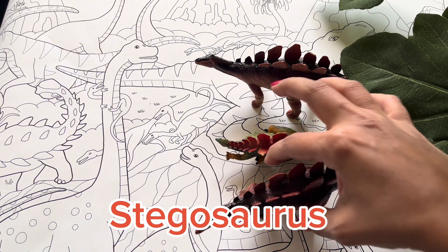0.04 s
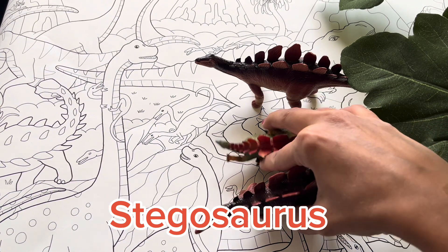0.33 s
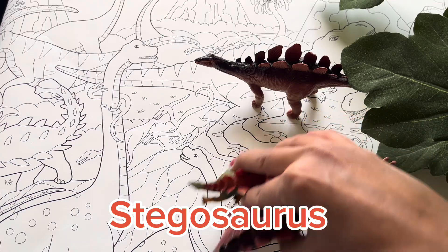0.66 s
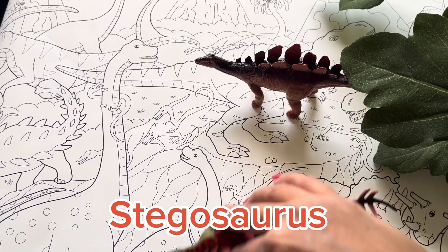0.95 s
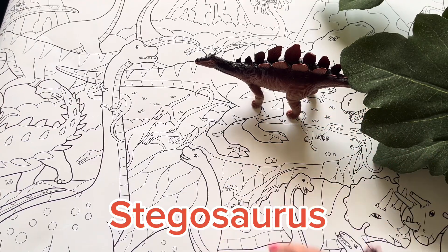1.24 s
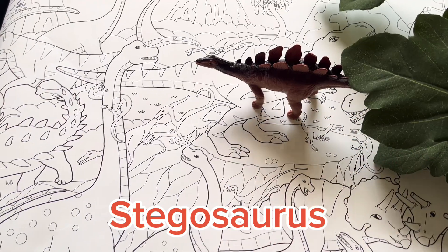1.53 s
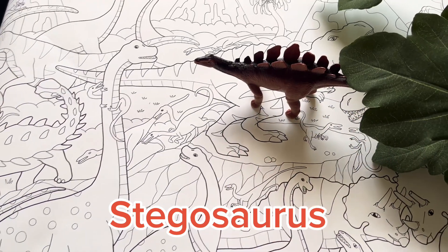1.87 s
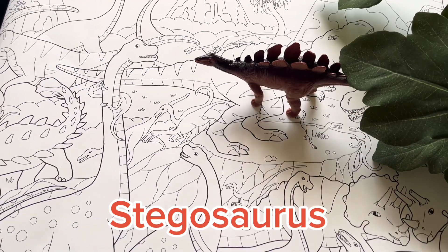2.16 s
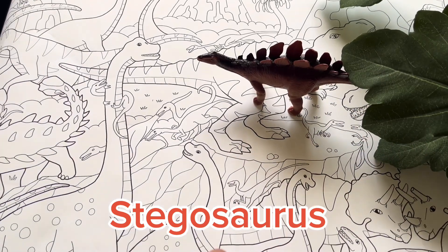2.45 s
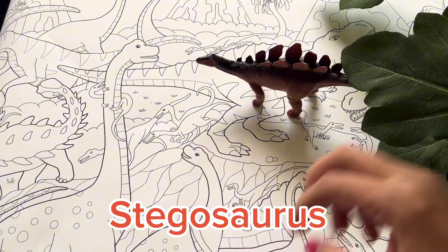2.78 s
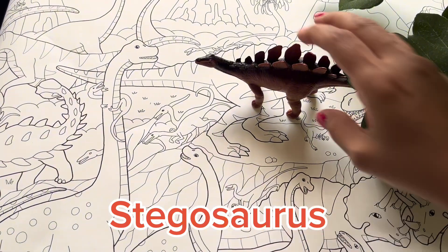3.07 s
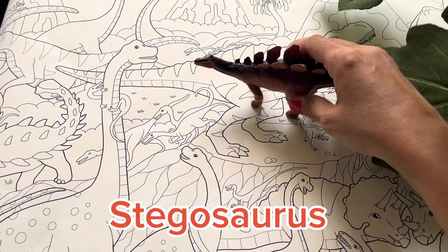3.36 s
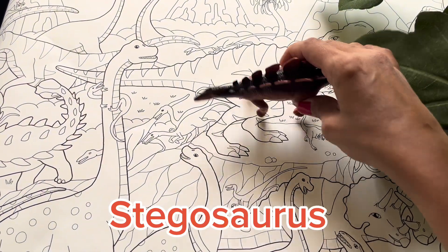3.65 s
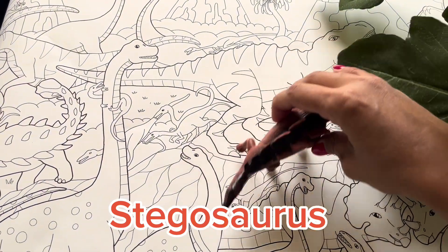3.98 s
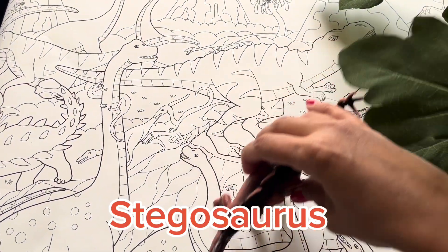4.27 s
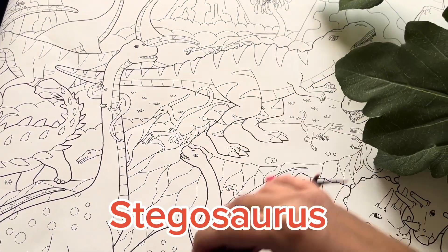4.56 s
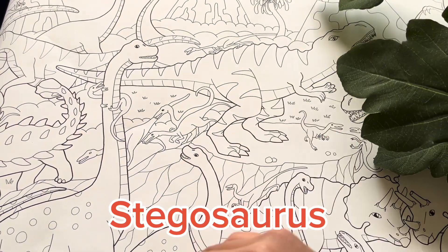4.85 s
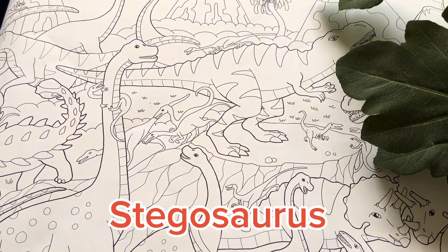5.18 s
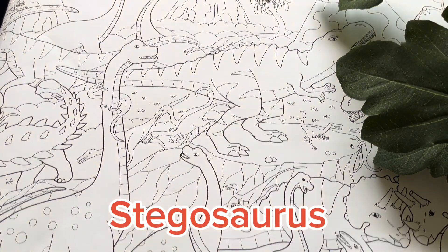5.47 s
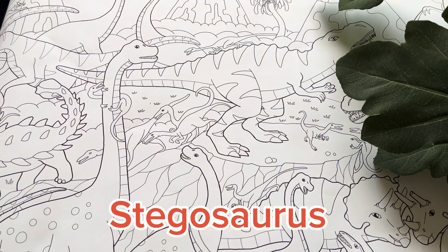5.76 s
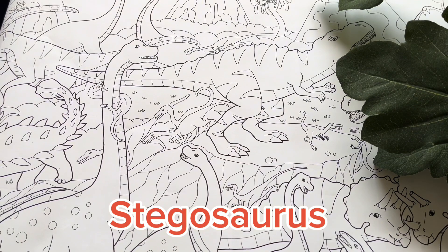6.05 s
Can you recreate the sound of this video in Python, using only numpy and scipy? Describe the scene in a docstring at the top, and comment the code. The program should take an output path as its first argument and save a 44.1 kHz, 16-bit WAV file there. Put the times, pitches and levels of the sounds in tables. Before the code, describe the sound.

Close to the microphone in a small room, a hand picks plastic toy figures off a paper poster with a cluster of soft thuds and snaps. They are put down on the tabletop with knocks, a short scrape and faint squeaks. Another figure is lifted with a sharp snap and a few clicks, and one loud knock comes last. Fingers rub and tick lightly over a faint appliance hum.

```python
"""Over the faint hum of an appliance, plastic toy figures thud and snap on a paper poster in a small room.
Lifted off and put down close to the microphone, they knock, scrape and squeak on the tabletop.
Each impact excites the damped modes of paper, plastic or wood; the table's ring reaches the microphone
through its stand. Fingers rub and tick on the plastic by stick-slip friction. One loud knock comes last."""
import sys
import numpy as np
from scipy import signal
from scipy.fft import rfft, irfft, next_fast_len
from scipy.io import wavfile

SR = 44100
rng = np.random.default_rng(int(sys.argv[2]) if len(sys.argv) > 2 else 0)


def bounce(signal):
    """Save signal as a 16-bit WAV file at the path given by the first command-line argument."""
    frames = np.transpose(np.atleast_2d(signal))
    limited = np.clip(frames, -1, 1)
    pcm = np.round(limited * 32767).astype(np.int16)
    wavfile.write(sys.argv[1], SR, pcm)


N = 274169
TIME = np.arange(N) / SR
SCUFF_HZ, RASP_HZ, AIR_HZ = (673, 2030), (2510, 5960), (8270, 14000)
# modes of the tabletop: (frequency [Hz], level [dB], t60 before the hand alters it [s])
TABLE_MODES = [(74.4, -24, 0.3), (112.3, -29.5, 0.56), (206.5, -13, 0.26), (278, -21, 0.096),
               (381, -2, 0.03), (437.2, -9.5, 0.069), (474.7, -5.5, 0.044), (588, -28, 0.21),
               (670, -16, 0.073), (893.4, -21.5, 0.078), (932, -16.5, 0.024), (1135, -15.5, 0.022),
               (1239, -18, 0.031), (1747, -27, 0.043), (1846, -56, 0.1), (2038, -30.5, 0.018),
               (2246, -34.5, 0.029), (3054, -31.5, 0.021)]
# points at which a blow's drive is given: (frequency [Hz])
BLOW_HZ = [200, 420, 700, 1400]


def from_db(db):
    """Decibels to amplitude ratio."""
    return 10 ** (np.asarray(db) / 20)


def rms_one(x):
    """Normalisation to unit power."""
    return x / np.sqrt(np.mean(x ** 2) + 1e-20)


def at_hz(points, hz):
    """Interpolation on a log-frequency axis."""
    f, value = np.transpose(points)
    return np.interp(np.log(hz), np.log(f), value)


def band(x, edges_hz, kind="band", order=2):
    """Causal Butterworth filter."""
    sections = signal.butter(order, np.clip(edges_hz, 10, SR * 9 / 20), kind, fs=SR, output="sos")
    return signal.sosfilt(sections, x + 1e-18)


def shaped(x, gain_at):
    """Linear filtering: the spectrum times a frequency response."""
    size = next_fast_len(N + 4096, True)
    hz = np.maximum(np.arange(size // 2 + 1) * SR / size, 1)
    return irfft(rfft(x, size) * gain_at(hz), size)[..., :N]


def drift(per_s):
    """Random modulation of unit power."""
    knots = rng.standard_normal(4096)
    return rms_one(np.interp(TIME * per_s, np.arange(len(knots)), knots))


def held(start, end, rise_s, fall_s):
    """Envelope of a movement: linear rise, plateau, exponential decay."""
    return np.clip((TIME - start) / rise_s, 0, 1) * np.exp(-np.clip((TIME - end) / fall_s, 0, 20))


def ring(drive, hz, t60):
    """Damped resonator: a unit impulse starts a decaying unit sine."""
    r, w = from_db(-60 / (t60 * SR)), 2 * np.pi * hz / SR
    return signal.lfilter([0, np.sin(w)], [1, -2 * r * np.cos(w), r * r], drive + 1e-18)


def grains(per_s, spread_db):
    """Stick-slip friction as a Poisson train of uneven impulses."""
    sizes = from_db(spread_db * np.minimum(rng.exponential(1, N), 4)) * rng.choice([-1, 1], N)
    return sizes * (rng.random(N) < per_s / SR)


def diffuse(pair, direct=0):
    """Spatial coherence: the two microphone ports agree in the bass, and more so for direct sound."""
    # diffuse field: (frequency [Hz], left-right correlation [-1..1])
    coherence = [(60, 0.93), (290, 0.61), (640, 0.28), (1400, -0.42), (3100, 0.63), (6800, -0.64),
                 (13000, 0.72)]

    def weights(hz):
        alike = np.clip(direct + (1 - direct) * at_hz(coherence, hz), -.99, .99)
        return np.sqrt(1 + np.array([[1], [-1]]) * alike)
    mid, side = shaped(pair, weights)
    return np.array([mid + side, mid - side])


def panned(x, balance):
    """Frequency-dependent level difference between the ports."""
    return shaped(x, lambda hz: from_db(np.array([[.5], [-.5]]) * at_hz(balance, hz)))


def room(x, t60, wet_db):
    """Reverberation: dense reflections decay exponentially, differently at each port."""
    age = TIME[:SR // 2]
    tail = rng.standard_normal((2, len(age))) * from_db(-60 * age / t60) * (age > .004)
    tail = band(tail, 8400, "low", order=1)   # walls absorb the treble
    tail /= np.sqrt(np.sum(tail ** 2, axis=1, keepdims=True))
    return x + from_db(wet_db) * signal.fftconvolve(x, tail, axes=1)[:, :N]


def appliance(beat_hz=3.668, swell_s=4.43, waver_db=1.34):
    """Beating: a motor turns a little slower than the mains, so its hum throbs."""
    # hum: (frequency [Hz], rms level [dB], relative level of a partner beat_hz higher [dB])
    partials = [(58.3, -53.5, -19.5), (116.2, -52.5, -3), (175.6, -65, -7), (235.5, -61.5, -8),
                (292, -73.5, -7.5), (352, -74.5, -2.5)]
    beat, hum = 2 * np.pi * beat_hz * (TIME - swell_s), 0
    for hz, db, partner_db in partials:
        phase = 2 * np.pi * (hz * TIME + rng.random())
        amplitude = np.sqrt(2) * from_db(db + waver_db * drift(8.4))
        hum = hum + amplitude * (np.sin(phase) + from_db(partner_db) * np.sin(phase + beat))
    return hum


def still_air(db=-50.5):
    """The room's ambient noise is a diffuse field, strongest in the bass."""
    # noise spectrum: (frequency [Hz], relative density [dB])
    spectrum = [(30, -26), (55, 6.5), (90, 0.5), (160, -7), (300, -14.5), (500, -23.5), (900, -34),
                (1500, -25), (2000, -33.5), (2550, -54), (4000, -66.5), (6500, -46), (12500, -53.5),
                (16000, -77)]
    air = shaped(diffuse(rng.standard_normal((2, N))), lambda hz: from_db(at_hz(spectrum, hz)))
    return from_db(db) * rms_one(air)


def brushing():
    """Gains of scuff, rasp and air: the hand's sweeps add in power to a faint hiss."""
    # sweeps of the hand: (start [s], end [s], rasp level [dB], air above rasp [dB])
    sweeps = [(0.502, 0.704, -86, 18.5), (1.088, 1.383, -73, 1), (1.63, 1.798, -69, 0.5),
              (1.894, 2.144, -80, 2), (2.307, 2.69, -69, -0.5), (2.85, 3.003, -75, 2),
              (3.256, 3.385, -69, -4.5), (3.543, 3.853, -70.5, -1.5), (3.89, 4.298, -65, -6),
              (4.56, 4.85, -86, 8), (4.802, 5.493, -71.5, 0), (6.036, 6.22, -68.5, -7)]
    rasp, air = from_db(-80.5), from_db(-92.5)
    for start, end, db, air_db in sweeps:
        sweep = from_db(db) * held(start, end, rise_s=0.086, fall_s=0.026)
        rasp, air = np.hypot(rasp, sweep), np.hypot(air, from_db(air_db) * sweep)
    return np.array([np.zeros(N), rasp, air])


def contact_gains(db, brightness, fall_db_per_octave):
    """Spectral envelope of a contact: scuff, rasp and air weaken with distance from its brightness."""
    octaves = np.log2([SCUFF_HZ, RASP_HZ, AIR_HZ]).mean(axis=1)
    away = np.abs(octaves - octaves[1] - brightness)
    return from_db(db - fall_db_per_octave * (away - away.min()))[:, None]


def ticks(tick_s=0.0011, crack_db=22.5, grit_db=-1, right_lag_s=.00003):
    """Sudden release: a nail or an edge lets go with an impulsive crack and a puff of grit."""
    # ticks: (time [s], level [dB], brightness [octaves above the rasp])
    releases = [(0.3186, -45, -0.91), (0.3662, -50, -1.6), (0.716, -57.5, 1.8), (0.8805, -53, 0.26),
                (0.8947, -55, 0), (0.944, -58, 0.1), (0.949, -50, 0.12), (1.0697, -48.5, -0.07),
                (1.074, -64, 0.1), (1.1137, -47, -0.87), (1.138, -49, 1.9), (1.143, -62, 1.7),
                (1.3845, -48.5, 0.72), (1.689, -43.5, 0.46), (1.7563, -55, 1.7), (1.788, -37.5, 1.42),
                (1.7912, -47, 1.2), (1.7938, -49, 1.6), (1.8163, -55, 1.7), (1.8452, -52.5, 1.7),
                (1.917, -48.5, -1.11), (1.994, -61, -1), (2.0032, -64, 0.51), (2.032, -61.5, 1),
                (2.113, -60, 0.5), (2.1446, -42.5, 0.88), (2.3126, -41, 0.39), (2.339, -52.5, 1.1),
                (2.363, -55, 0.78), (2.403, -57.5, 1), (2.433, -58, 0.63), (2.548, -45, -1.32),
                (2.686, -52.5, 1.1), (3.761, -67, 1.7), (3.781, -51, 1.1), (3.8929, -33.5, -0.77),
                (4.1685, -43.5, -1.02), (5.494, -33, 0.51)]
    # placing of scuff, rasp and air: (left minus right [dB])
    pans = [-0.5, 1.5, -1]
    noise, age, out = diffuse(rng.standard_normal((2, N)), direct=0.27), TIME[:SR // 20], 0
    cracks, puffs = np.zeros((2, 3, N))
    for s, db, brightness in releases:
        gains, start = contact_gains(db, brightness, fall_db_per_octave=14), int(s * SR)
        puffs[:, start:start + len(age)] += gains * age / tick_s * np.exp(1 - age / tick_s)
        cracks[:, int((s + tick_s / 2) * SR)] += gains[:, 0]
    for crack, puff, edges_hz, pan_db in zip(cracks, puffs, [SCUFF_HZ, RASP_HZ, AIR_HZ], pans):
        crack = from_db(crack_db) * band(crack, edges_hz, order=3)
        grit = from_db(grit_db) * puff * rms_one(band(noise, edges_hz, order=3))
        tick = np.array([crack, np.interp(TIME - right_lag_s, TIME, crack)]) + grit
        out = out + tick * from_db(pan_db * np.array([[.5], [-.5]]))
    return out


def fingers(release_s=0.0091, brush_db=-3, ring_db=-2, ring_t60=0.0018):
    """Friction noise: tiny slips and ticks, filtered by the resonances of plastic and paper."""
    # slides: (start [s], end [s], rise [s], level [dB], brightness [octaves above the rasp], ring [Hz])
    strokes = [(0.032, 0.033, .004, -63, -0.6, 4430), (0.339, 0.489, 0.054, -58, -1.23, 4500),
               (0.402, 0.56, 0.013, -66.5, 0.9, 4670), (0.88, 0.944, 0.0035, -63.5, -0.06, 5340),
               (1.067, 1.134, 0.0028, -62, 0.1, 4520), (1.381, 1.466, 0.0079, -56.5, 0.46, 3940),
               (1.587, 1.666, 0.082, -66.5, 0.6, 4900), (2.103, 2.147, 0.039, -61, 5, 5600),
               (3.151, 3.284, 0.061, -64, -0.54, 3180), (3.504, 3.577, 0.033, -66, 0.25, 5150),
               (3.58, 3.654, .012, -62.5, -1, 3680), (3.776, 3.824, 0.0042, -66.5, 1, 4420),
               (3.882, 3.929, 0.0023, -48.5, -2, 3680), (3.951, 4.119, 0.023, -63.5, -14.5, 1420),
               (4.125, 4.217, 0.029, -58, -1.06, 3500), (4.168, 4.214, .02, -61, 1.8, 3600),
               (4.335, 4.394, 0.048, -65.5, 2, 3830), (5.043, 5.087, 0.021, -76.5, -1.5, 4650)]
    # resonances of the handled things: (frequency [Hz], gain [dB])
    colour = [(620, 10), (950, -2), (1250, 3.5), (1700, -3), (2250, -0.5), (2650, -4.5), (3400, -7),
              (4400, -4.5), (5000, -3), (5700, -6.5), (6600, 0), (9500, -3), (13000, -4)]
    slips = np.array([grains(per_s=2600, spread_db=-0.5) for port in range(2)])
    slips = diffuse(slips, direct=0.24) * from_db(1.36 * drift(90))
    sliding, out = 0, ticks()
    rasp = band(slips, RASP_HZ)
    for start, end, rise, db, brightness, hz in strokes:
        stroke = contact_gains(db, brightness, fall_db_per_octave=6.5) * held(start, end, rise, release_s)
        sliding = sliding + stroke
        out = out + from_db(ring_db) * stroke[1] * rms_one(ring(rasp, hz, ring_t60))
    sliding = np.hypot(sliding, from_db(brush_db) * brushing())
    for slide, edges_hz in zip(sliding, [SCUFF_HZ, RASP_HZ, AIR_HZ]):
        out = out + slide * rms_one(band(slips, edges_hz, order=3))
    return room(shaped(out, lambda hz: from_db(at_hz(colour, hz))), t60=0.25, wet_db=-13.0)


def blow_drive(strength_db, hardness, spot_db, hollow_db=0):
    """Modal excitation in dB at BLOW_HZ: hardness favours high modes, the spot trades body for knock."""
    # effect of the struck spot at each of BLOW_HZ: (share of spot_db [ratio])
    spot_share = [-0.36, 0.81, -0.76, 0.64]
    octaves = np.log2(BLOW_HZ)
    tilt_db = hardness * (octaves - octaves.mean())
    return strength_db + tilt_db + spot_db * np.array(spot_share) + hollow_db * np.array([0, 0, 1, 0])


def strike(modes, s, drive_db, spread_s, rise_cycles, pitch=1, sustain=1):
    """Dispersion in a struck plate: low bending waves are slower, so the boom follows the clack."""
    hz, level_db, t60 = np.array(modes).T[:, :, None]
    start, out = int(s * SR), np.zeros(N)
    delay = spread_s * (np.sqrt(hz.max() / hz) - 1)
    age = np.maximum(TIME[start:start + SR // 2] - s - delay, 0)
    mode_db = level_db + np.interp(np.log(hz), np.log(BLOW_HZ), drive_db)
    decay = from_db(mode_db - 60 * age / (t60 * sustain))
    swell = 1 - np.exp(-(age * hz / rise_cycles) ** 2)
    out[start:start + SR // 2] = np.sum(decay * swell * np.sin(2 * np.pi * hz * pitch * age), axis=0)
    return out


def poster(bottom_hz=60, hollow_db=-7):
    """Air cushioning: struck paper flaps on the air under it with a soft, hollow thud."""
    # modes of the loose sheet: (frequency [Hz], level [dB], t60 [s])
    modes = [(77, -34, 0.42), (116, -28, 0.15), (184.6, -18.5, 0.2), (203.4, -9.5, 0.12),
             (235, -22.5, 0.24), (272.5, -23, 0.13), (330, -14.5, 0.029), (458, -28, 0.081),
             (721, -34, 0.16), (851, -25.5, 0.036), (917, -27, 0.047), (1204, -42, 0.067),
             (1960, -52, 0.091)]
    # feet and fingers landing: (time [s], level [dB], hardness [dB/octave], spot [dB], pitch [ratio])
    blows = [(0.318, -13.5, -3.5, 14, 1.24), (0.327, -18.5, 2.5, -19.5, 0.9), (0.349, -23.5, -2, 5, 1.33),
             (0.367, -25, 7, -17, 1.32), (0.388, -20.5, -2, 4, 1.54), (0.4167, -13, -4, 20.5, 1.28),
             (0.432, -25, -0.5, 20, 1.76), (0.52, -23, -1, 5, 1.32), (0.54, -34, 6, 8, 1.5),
             (1.114, -15, -4, 28.5, 0.61), (1.118, -18.5, -2.5, 18, 1.23), (3.516, -24.5, 3, -4, 1.19),
             (3.8915, 4, -1.5, 5.5, 1.037)]
    hollow = hollow_db * np.array([0, 1, 1, 0])
    thuds = sum(strike(modes, s, blow_drive(*blow) + hollow, spread_s=0.00077, rise_cycles=0.54,
                       pitch=pitch) for s, *blow, pitch in blows)
    thuds = band(thuds, bottom_hz, "high")
    return room(np.array([thuds, thuds]), t60=0.67, wet_db=-16.0)


def figure(grit_db=5.5):
    """Shell resonance: feet catch on the paper in snaps and gritty bursts that ring the hollow figure."""
    # modes of the shell: (frequency [Hz], level [dB], t60 [s])
    modes = [(934, 0, 0.019), (1273, 2.5, 0.012), (2050, -2, 0.0032), (3150, -6, 0.012),
             (3570, -2.5, 0.0043), (4560, -10, 0.008), (11200, -19.5, 0.0022)]
    # feet rasping: (start [s], end [s], level [dB], tilt [dB/octave])
    scrapes = [(0.391, 0.396, -57, -14), (0.419, 0.436, -49, -20), (0.473, 0.484, -56.5, 1),
               (0.502, 0.511, -48, -5), (1.105, 1.13, -64, 0.5), (2.528, 2.558, -67, 0),
               (3.507, 3.561, -56, -13), (3.889, 3.892, -30, -3.5), (4.157, 4.166, -56, 1),
               (4.172, 4.19, -53, -7), (4.201, 4.21, -48.5, -0.5), (4.213, 4.231, -57, -1.5),
               (4.265, 4.27, -52, -8), (4.372, 4.393, -64, -5)]
    # a foot striking or snapping free: (time [s], level [dB], tilt [dB/octave])
    snaps = [(0.327, -47, 4), (0.367, -34, -2.5), (0.386, -42, -3.1), (0.417, -32, -5), (0.471, -40, -2),
             (0.505, -35, -4), (3.8905, -20, 0.5), (4.1555, -53, 7), (4.161, -45, -4), (4.179, -42, 0),
             (4.187, -45.5, -2), (4.204, -42, 4.5), (4.2095, -45, 5), (4.268, -38, -6)]
    slips, out = grains(per_s=1500, spread_db=grit_db), 0
    bursts = [(from_db(db) * held(start, end, rise_s=0.0018, fall_s=0.0019), tilt)
              for start, end, db, tilt in scrapes]
    for k, (hz, db, t60) in enumerate(modes):
        octaves = np.log2(hz / modes[0][0])
        drive = slips * sum(burst * from_db(tilt * octaves) for burst, tilt in bursts)
        for s, snap_db, tilt in snaps:
            drive[int(s * SR)] += from_db(snap_db + tilt * octaves)
        out = out + (-1) ** k * from_db(db) * ring(drive, hz, t60) / np.std(ring(slips, hz, t60))
    return room(from_db(-3.5) * np.array([out, out]), t60=0.49, wet_db=-14.5)


def squeak(level_db=-68.5, width_hz=220, stutter_db=2.5):
    """Narrow-band stick-slip: a dragged plastic foot squeaks in rough spurts."""
    # spurts: (time [s], half length [s], relative level [dB], pitch [Hz])
    spurts = [(0.032, 0.0076, -5, 4300), (2.457, 0.027, -4, 5100), (2.513, 0.014, -4.5, 5030),
              (2.554, 0.01, 2, 5070), (2.6, 0.0094, -3, 5080), (2.634, 0.012, 3, 5090),
              (2.695, 0.0087, -4, 4920)]
    slips, out = grains(per_s=2700, spread_db=3.0), 0
    for s, half, db, hz in spurts:
        tone = rms_one(band(slips, (hz - width_hz / 2, hz + width_hz / 2)))
        out = out + from_db(level_db + db) * np.exp(-((TIME - s) / half) ** 2) * tone
    return out * from_db(stutter_db * drift(190))


def drag(judder_db=1.5, t60_ratio=0.74):
    """Forced vibration: a figure pushed in fits sticks and slips, driving the hand-damped table."""
    # pushes: (start [s], end [s], level [dB], growth [dB/s], middle, high modes above the low [dB])
    pushes = [(1.352, 1.424, -58.5, -5, -6, -7), (1.969, 2.143, -54.5, 1, -15, -8.5),
              (2.346, 2.435, -44, -21, -17, -14), (2.434, 2.504, -40.5, 68, -10, -4),
              (2.497, 2.539, -39.5, 22, 1, 2.5), (2.54, 2.551, -46.5, 0, 16, -6),
              (2.587, 2.604, -49, -60, 8.5, 7.5), (2.61, 2.651, -44, -70, -8, -18.5),
              (2.682, 2.698, -46.5, 0, -6, -14)]
    slips = grains(per_s=900, spread_db=2.0)
    low, middle, high = [sum(from_db(db) * ring(slips, hz, t60 * t60_ratio) for hz, db, t60 in modes)
                         for modes in (TABLE_MODES[2:9], TABLE_MODES[9:11], TABLE_MODES[11:])]
    low = rms_one(band(low, (330, 620)))
    middle = rms_one(band(middle, (800, 1050)))
    high = rms_one(band(high, (950, 1850), order=5))
    out, judder = 0, from_db(judder_db * drift(170))
    for start, end, db, growth, middle_db, high_db in pushes:
        age = np.clip(TIME, start, end) - start
        force = from_db(db + growth * age) * held(start, end, rise_s=0.013, fall_s=0.0073)
        out = out + force * judder * (low + from_db(middle_db) * middle + from_db(high_db) * high)
    return out


def tabletop(top_hz=2100, bottom_hz=55):
    """Structure-borne sound: knocks and scraping lose their treble in the wood and climb the stand."""
    # figures knocking: (time [s], level [dB], hardness [dB/octave], spot [dB], pitch [ratio],
    # ring length under the hand [ratio], gain near 700 Hz [dB])
    blows = [(1.391, -32, -4, 9.5, 1.1, 0.82, 7), (1.4561, -19.5, 3.5, 4.5, 0.98, 0.79, 6.5),
             (1.7158, -15.5, -2.7, -1, 0.995, 0.53, 13.5), (1.727, -26.5, 4, 3, 1.01, 1.03, 12.5),
             (1.776, -31.5, 5, -4.5, 1.01, 0.98, -2), (1.9163, -20.5, 13.5, -3.5, 0.98, 0.78, -2.5),
             (1.965, -32, 3, -12, 1.06, 1.2, -8.5), (1.994, -25.5, 5, -4.5, 0.97, 1.2, -2),
             (2.009, -29.5, 3, -14, 0.94, 0.87, -1), (2.044, -31.5, 0, -2, 1.07, 0.91, 3.5),
             (2.068, -32.5, -0.5, -13, 0.92, 0.74, 1.5), (2.123, -35, 6, -4.5, 0.94, 1.46, 0),
             (2.1398, -26.5, -2.5, -9, 1.03, 0.71, -7), (2.3115, -3, 4, 5, 0.95, 0.72, -3.5),
             (2.5075, -13, 3, -4, 1.02, 0.54, -10), (2.532, -21.5, 8, 5, 0.84, 0.62, 3),
             (2.586, -25.5, 11.5, -10.5, 0.93, 1.15, -7), (2.686, -31.5, 0, -4, 0.984, 0.54, -1.5),
             (5.495, 1.5, 0.7, 0.5, 0.99, 0.84, -5)]
    # pitches the table hardly carries to the stand: (frequency [Hz], width [Hz])
    nodes = [(570, 75), (815, 71), (1520, 33)]
    # transmission by the stand: (frequency [Hz], left minus right [dB], lag of the left port [rad])
    stand = [(20, 7, 1.5), (74.5, -3, 1.1), (119, -0.5, 1.3), (300, -0.5, 0.64), (470, 3, 0.86),
             (690, 2, 1.7), (955, 3, 1.48), (1256, 10, 1.75), (1620, 5.5, 3.5), (1690, 14.5, 5),
             (2280, 9.5, 5.5), (5120, 13.5, 7)]
    knocks = sum(strike(TABLE_MODES, s, blow_drive(*blow, hollow_db), spread_s=.0015, rise_cycles=0.36,
                        pitch=pitch, sustain=sustain) for s, *blow, pitch, sustain, hollow_db in blows)
    wood = band(knocks + drag(), top_hz, "low", order=8)
    wood = band(wood, bottom_hz, "high")
    for hz, width in nodes:
        wood = signal.lfilter(*signal.iirnotch(hz, hz / width, fs=SR), wood)
    balance = [(hz, db) for hz, db, _ in stand]
    lag = [(hz, radians) for hz, _, radians in stand]
    right = wood + squeak()
    left = shaped(right, lambda hz: np.exp(-1j * at_hz(lag, hz)))
    return room(panned(np.array([left, right]), balance), t60=0.17, wet_db=-25.0)


def scene():
    """Superposition of all sources at the two microphone ports."""
    # the hand works slightly to the left: (frequency [Hz], left minus right [dB])
    hand_balance = [(200, 1.5), (380, 3), (700, -2), (1290, 0.5), (2380, 3.5), (4400, 6), (8100, 0),
                    (15000, 0)]
    # placing of hum and air: (frequency [Hz], left minus right [dB])
    room_balance = [(60, 2), (110, -0.5), (200, 2.5), (380, 2.5), (700, -0.5), (1290, 6.5), (2380, 12.5),
                    (4400, 17), (8100, 2), (15000, -2)]
    handling = tabletop() + figure() + panned(poster() + fingers(), hand_balance)
    return handling + panned(appliance() + still_air(), room_balance)


def record(dry, cutoff_hz=16800):
    """Overall tone: a dip near 8.3 kHz softens the hiss, and a steep low-pass cuts the top."""
    # treble dip: (frequency [Hz], gain [dB])
    treble_dip = [(7000, -0.5), (8300, -17), (9700, -2)]
    softened = shaped(dry, lambda hz: from_db(at_hz(treble_dip, hz)))
    return signal.sosfilt(signal.cheby2(14, 60, cutoff_hz, fs=SR, output="sos"), softened)


dry = scene()
out = record(dry)
bounce(out)
```